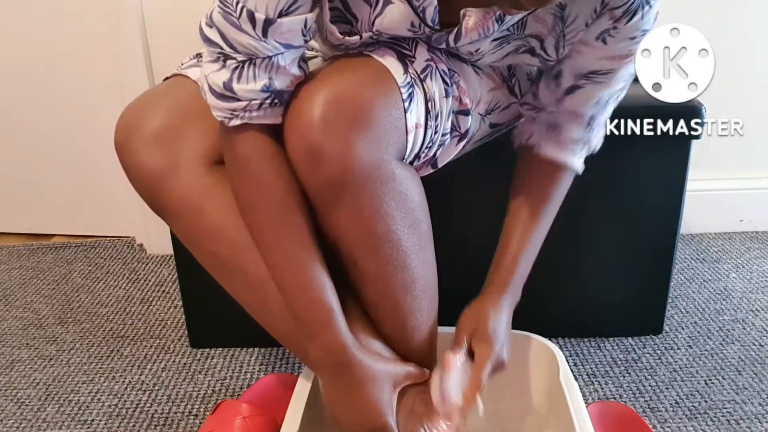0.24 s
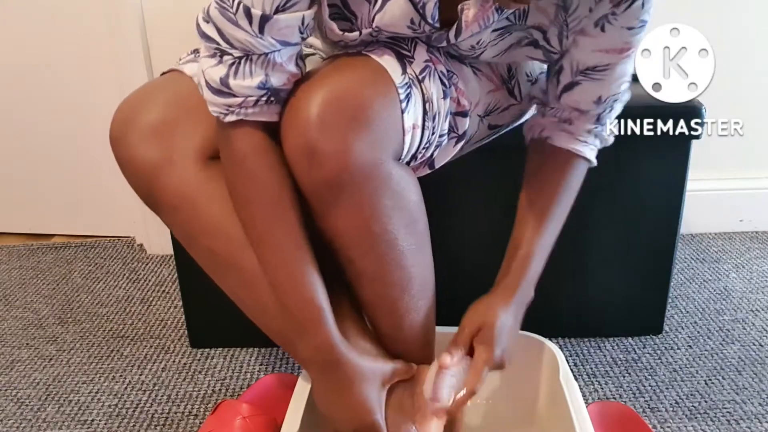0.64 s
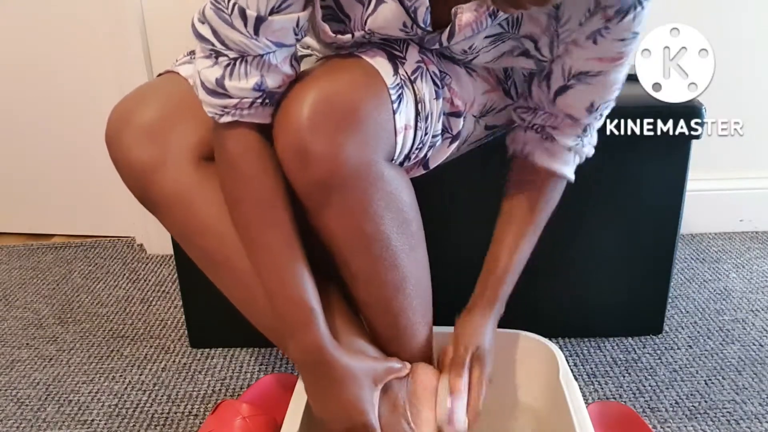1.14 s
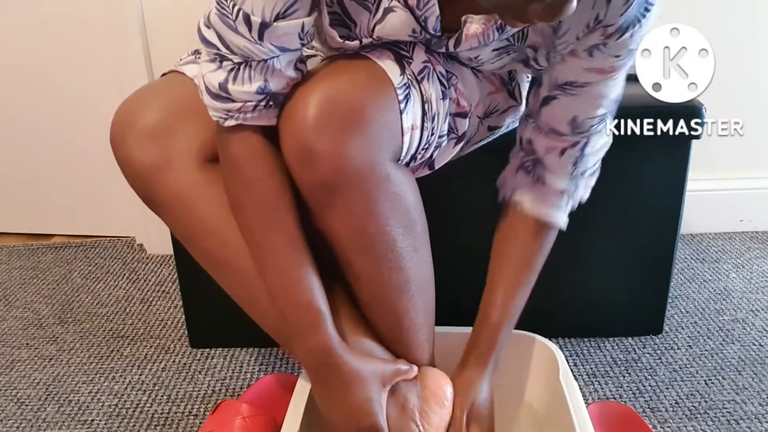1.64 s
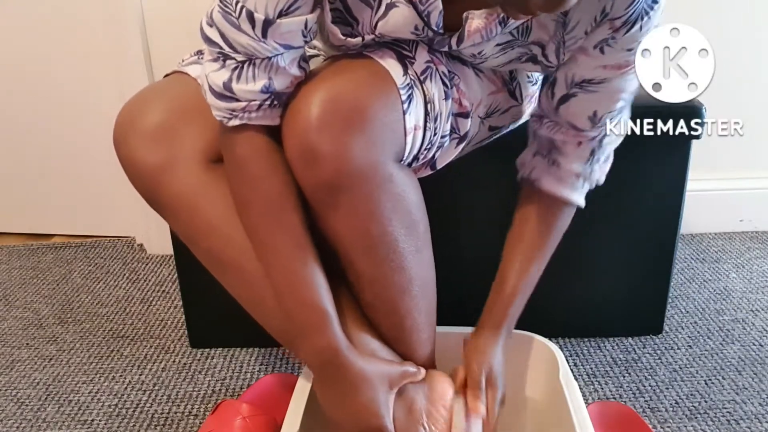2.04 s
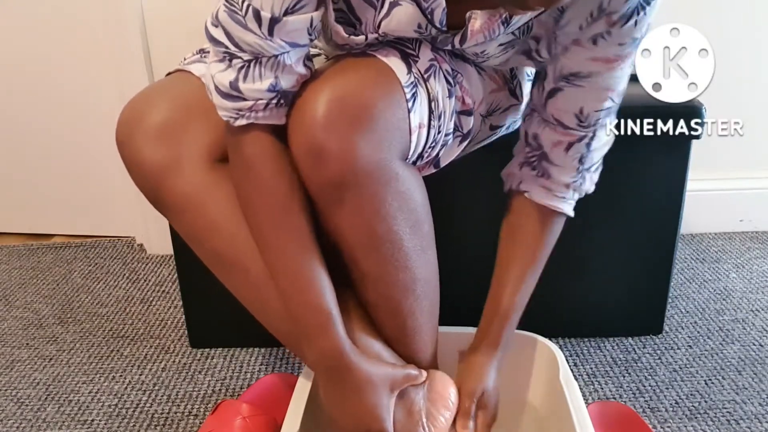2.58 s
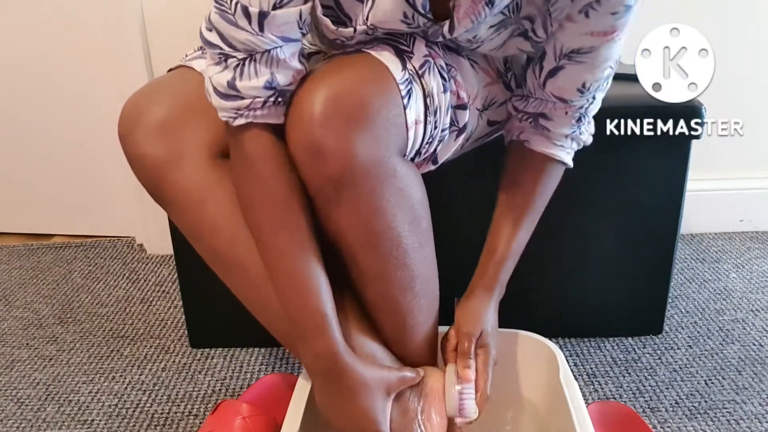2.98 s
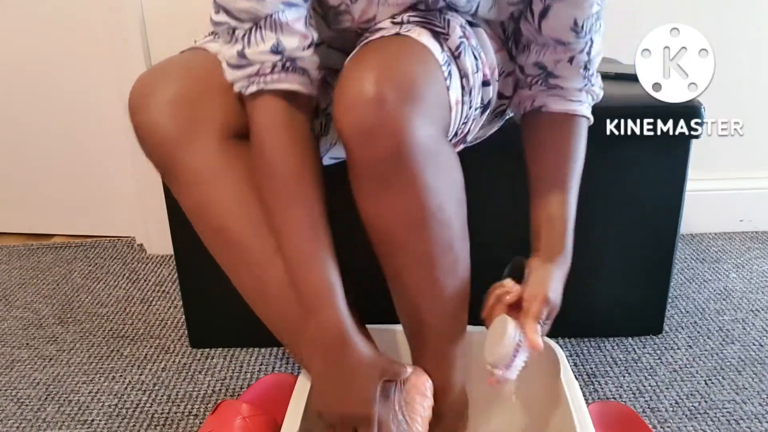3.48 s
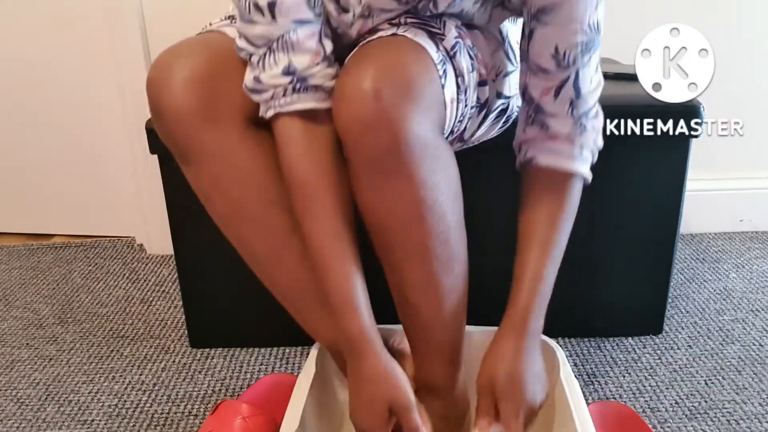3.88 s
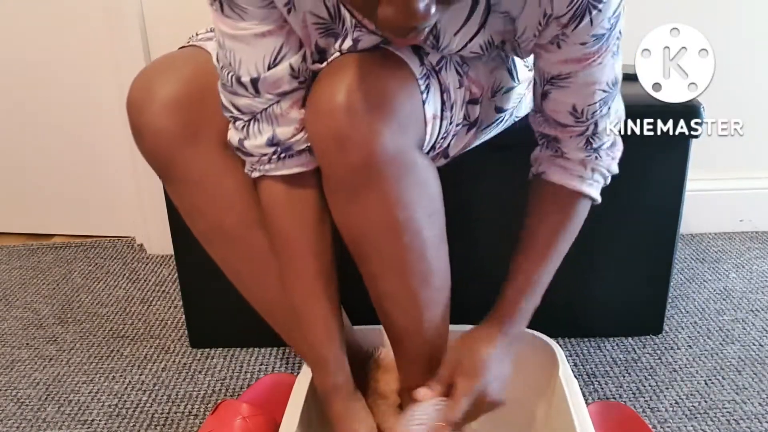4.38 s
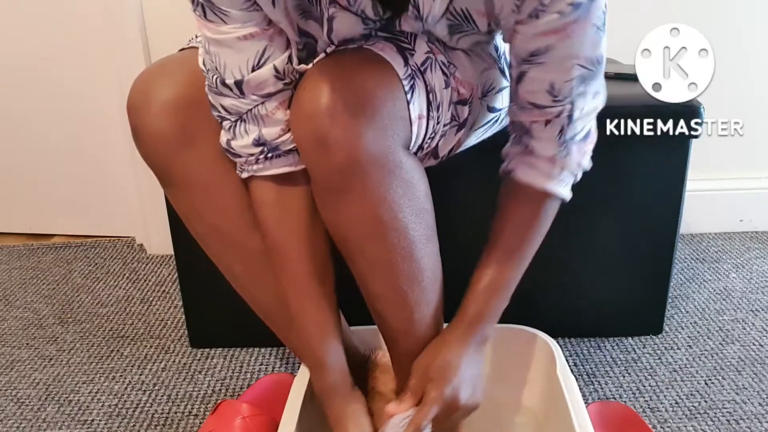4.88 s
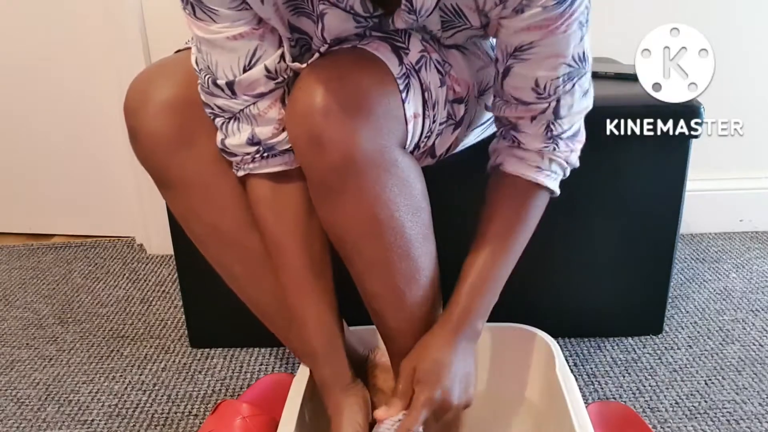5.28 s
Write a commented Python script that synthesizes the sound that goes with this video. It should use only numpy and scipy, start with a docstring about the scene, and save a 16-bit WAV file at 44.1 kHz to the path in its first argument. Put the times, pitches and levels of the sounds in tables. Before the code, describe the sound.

In a quiet room, heard from nearby, a splash with bubbles and drops comes from a plastic tub. Soft, gritty scrubbing follows, stone against a wet foot, several strokes a second, with faint creaks from the tub. The scrubbing fades, the tub gives a couple of dull knocks, and a second spell of sloshing and dripping dies away into faint rubbing.

```python
"""Pumice on a wet heel.

A pumice stone rasps to and fro on a heel, indoors: friction of grit on skin makes a swell of noise at
each stroke. Water sloshes as stone and foot go into a plastic basin; bubbles ring and drops smack.
The basin creaks, thumps and is knocked into resonance, and a quiet room reverberates and rumbles."""
import sys
import numpy as np
from scipy import signal
from scipy.fft import rfft, irfft, next_fast_len
from scipy.io import wavfile
from scipy.ndimage import uniform_filter1d

SR = 44100
rng = np.random.default_rng(int(sys.argv[2]) if len(sys.argv) > 2 else 0)


def to_wav(s):
    """Save 16-bit WAV."""
    ch = np.atleast_2d(s).T  # columns
    pcm = np.round(np.clip(ch, -1, 1) * 32767)  # PCM
    wavfile.write(sys.argv[1], SR, pcm.astype(np.int16))


N = 243431
T = np.arange(N) / SR


def scrub():
    """Friction noise: dense grit catches the skin and excites the duller resonances of heel and stone."""
    # Each row: time of full speed in seconds, level in dB, half width in seconds, body and treble in dB.
    strokes = [(0.667, -56.5, 0.027, -13, -5.5), (0.812, -67.5, 0.039, -13, 1.5),
               (0.918, -57.5, 0.061, -2, -1.5), (1.149, -58, 0.049, 0.5, -3),
               (1.242, -68.5, 0.0099, 5, -2.5), (1.326, -54, 0.037, 3.5, -1.5),
               (1.508, -61, .055, -4.5, -1), (1.713, -57.5, 0.035, 3, -0.5), (1.85, -70.5, 0.062, 2.5, 3),
               (1.937, -60, .055, -6, -3), (2.189, -66, 0.05, 3.5, 3), (2.394, -59.5, 0.043, -4, -2),
               (2.603, -62.5, .039, 1, 2), (2.78, -78, .042, -3.5, 3.5), (2.885, -68, 0.041, -15, -0.5),
               (3.135, -77.5, .033, -14.5, 2), (3.23, -76.5, 0.052, 1, 6), (3.5, -83, 0.12, 0.5, -4),
               (3.75, -80, .1, 1.5, 5.5), (3.846, -63, 0.029, 17.5, -1.5), (3.946, -83.5, 0.057, 4, 6),
               (5.285, -82.5, 0.038, -2.5, 4.5), (5.49, -72, 0.048, -1, -0.5)]
    # Each row: frequency in Hz, spectral level in dB.
    grit_spectrum = [(880, -45), (1500, -4), (1620, -7.5), (1870, -5.5), (2910, -1), (3410, -0.5),
                     (7390, -8), (14500, -23.5), (16000, -30)]
    # Each row: resonance in Hz, bandwidth in Hz, gain in dB.
    heel_modes = [(468, 150, 1), (795, 240, 5.5)]
    stone_modes = [(1307, 200, 11), (1360, 290, -0.5)]
    skew = 1.014  # stretches a stroke's rise and shortens its fall
    grit, treble, body = 0, 0, 0
    for s, db, half, body_db, treble_db in strokes:
        stroke = amp(db) * swell(s, half * skew, half / skew, flat=2.51)
        grit += stroke
        treble += amp(treble_db) * stroke
        body += amp(body_db) * stroke
    rasp = noise(band(spectrum(grit_spectrum), 1480, 5240), patchy_db=1)
    hiss = noise(band(spectrum(grit_spectrum), 5140, 15700), spiky_db=2, grain_s=0.0007, patchy_db=1.95)
    heel = noise(band(resonances(heel_modes), 420, 1100), spiky_db=3, grain_s=0.0018, patchy_db=-1.5)
    stone = noise(band(resonances(stone_modes), 950, 1550), spiky_db=4.5, grain_s=0.012, patchy_db=3.5)
    return amp(-3) * grit * rasp + amp(-1.5) * treble * hiss + body * (amp(-7.5) * heel + amp(-7) * stone)


def slosh():
    """Turbulence: wash, gurgle and spray follow the water's motion; small bubbles ring at random in it."""
    # One list a dip. Each row: time in seconds, level in dB, gurgle and spray in dB above that level.
    dips = [
        [(0, -50, 6, -3), (.061, -32.5, -5, -9.5), (.16, -55.5, 0, 0.5), (.2, -41, 0, -6.5),
         (.265, -44, -8, -8.5), (.35, -39.5, -4, -3), (.42, -41.5, -11.5, -13), (.47, -47.5, -1, -2.5),
         (.55, -58.5, -31, 0), (.61, -64.5, -34, -5.5), (.66, -68.5, -32, 2.5), (.76, -63, -3, -9),
         (.8, -90, -8, -9)],
        [(4.075, -77, -3.5, 4.5), (4.13, -48.5, -11, 3.5), (4.19, -48.5, -22, -15.5), (4.26, -63.5, 1, -3.5),
         (4.3, -48.5, -8, -6), (4.36, -55.5, 8, -3), (4.43, -53, 1.5, -10.5), (4.47, -44.5, 2.5, -18.5),
         (4.52, -42.5, -3.5, -5.5), (4.58, -51, 0.5, -5), (4.7, -71.5, -10, -3.5), (4.79, -69.5, 0, 2),
         (4.82, -56.5, -6.5, -9), (4.87, -57.5, -7, -5), (4.92, -83, -9, 4), (4.985, -78, -5.5, 3),
         (5.025, -56, -4.5, -5), (5.07, -67.5, -1, -2.5), (5.15, -95.5, -12.5, 10.5)],
    ]
    # Each row: frequency in Hz, spectral level in dB.
    wash_spectrum = [(180, -36.5), (300, -7.5), (645, -15), (946, -10), (1170, -7.5), (1480, -10),
                     (2140, -7), (3760, -3), (4910, -4.5), (9880, -19), (16000, -32)]
    # The air over the water. Each row: resonance in Hz, bandwidth in Hz, gain in dB.
    air_modes = [(785, 150, -4.5), (905, 130, 0), (1310, 100, -13), (1720, 140, -2.5), (3100, 490, 2),
                 (3620, 250, -1)]
    wash_db, gurgle_db, spray_db = np.full((3, N), -120.)
    for dip in dips:
        s, db, gurgle_over, spray_over = np.transpose(dip)
        wet = (T >= s[0]) & (T <= s[-1])
        for level, over in (wash_db, 0), (gurgle_db, gurgle_over), (spray_db, spray_over):
            level[wet] = np.interp(T[wet], s, db + over)
    colour = lambda f: spectrum(wash_spectrum)(f) * (1.8 + abs(resonances(air_modes)(f)))
    out = amp(wash_db - 1) * noise(band(colour, 1500, 6500), spiky_db=5, grain_s=0.0018, patchy_db=4)
    out += amp(gurgle_db) * noise(band(colour, 470, 1600), spiky_db=1.5, grain_s=0.0045, patchy_db=7.5)
    out += amp(spray_db) * noise(band(colour, 7900, 17000), spiky_db=3, grain_s=0.0016, patchy_db=-4.5)
    for when, pitch, life, faintness, pan in rng.random((2000, 5)):
        hz, n = 1200 * 8 ** pitch, int(when * N)
        db = (spray_db if hz > 6000 else wash_db)[n] - 7.5 - 3.5 * np.log(faintness + 0.018)
        if db > -90:
            ring = bubble(hz, t60=(15 + 35 * life) / hz, glide=0.05)
            place(out, n / SR, amp(db) * ring, pan_db=8 * (pan - 0.5))
    return out


def bubble(hz, t60, glide):
    """Damped oscillation: trapped air rings, rising in pitch as it nears the surface."""
    t = np.arange(int(t60 * SR)) / SR
    onset = 1 - np.exp(-t / 0.00077)
    return amp(-60 * t / t60) * onset * np.sin(2 * np.pi * hz * t * (1 + glide * t / t60))


def timed_bubbles():
    """Bubble resonance: further bubbles at set times, each ringing its own note for its own length, left of
    centre."""
    # Each row: start in seconds, level in dB, pitch in Hz, 60 dB decay time in milliseconds.
    bubbles = [(.016, -35, 527, 87), (0.058, -37, 6600, 10), (0.143, -30, 1460, 20), (.176, -35.5, 930, 86),
               (0.18, -25.5, 4010, 14), (0.203, -28.5, 1249, 77), (0.219, -35.5, 2630, 49),
               (0.238, -30, 4880, 16), (0.251, -31, 4600, 19), (.277, -25.5, 780, 43),
               (.307, -28.5, 5390, 18), (0.335, -33, 1590, 21), (0.347, -37, 2990, 72),
               (.356, -32, 2130, 33), (.389, -23.5, 5660, 10), (.405, -27, 3950, 17),
               (0.426, -23.5, 2300, 14), (0.424, -23, 3860, 18), (.447, -38, 1050, 22),
               (.458, -24, 3730, 13), (.464, -27, 2320, 16), (0.537, -42.5, 3170, 27),
               (.596, -37, 2086, 43), (0.654, -64, 1360, 100), (0.656, -52.5, 1784, 69),
               (0.683, -52.5, 1360, 47), (0.682, -43, 3320, 10), (1.915, -45.5, 9200, 9.4),
               (4.104, -24, 6450, 6.6), (4.134, -24.5, 6570, 10.5), (4.274, -30, 3640, 12.4),
               (4.297, -26.5, 3170, 13), (4.313, -35, 1080, 26), (4.312, -20, 7240, 11.6),
               (4.359, -43, 2500, 31), (4.382, -23.5, 2760, 14), (4.457, -32, 3970, 20),
               (4.476, -38.5, 3790, 150), (4.501, -30, 1420, 18), (4.514, -24, 7000, 8),
               (4.526, -29.5, 2830, 11.7), (4.531, -18.5, 8300, 10), (4.541, -20, 5600, 8.1),
               (4.556, -23, 3780, 9.6), (4.58, -36, 4600, 20), (4.584, -48.5, 930, 32),
               (4.635, -39.5, 4880, 13), (4.659, -45.5, 880, 15), (4.7, -46, 7200, 14),
               (4.72, -49, 3520, 21), (4.74, -32, 4970, 10), (4.758, -71, 5180, 11),
               (4.811, -40.5, 2250, 16), (4.849, -44, 4420, 11), (4.858, -49.5, 1180, 15),
               (4.939, -59.5, 3500, 46), (4.958, -48.5, 7630, 17), (4.996, -39.5, 7460, 14),
               (5.01, -41, 5990, 13), (5.021, -54, 2950, 22)]
    out = np.zeros((2, N))
    for s, db, hz, t60_ms in bubbles:
        place(out, s, amp(db) * bubble(hz, t60_ms / 1000, glide=0.022), pan_db=rng.normal(3, 0.74))
    return out


def smacks():
    """Impact noise: drops and wet skin snap briefly, then finer droplets fall back."""
    # Each row: start in seconds, level in dB, brightest frequency in Hz.
    impacts = [(.0059, -16.5, 3830), (.0082, -10, 1920), (.058, -35, 7400), (.168, -28.5, 7300),
               (0.197, -25, 3800), (0.252, -31, 3800), (.275, -22, 2380), (0.352, -21.5, 7500),
               (.387, -27.5, 5200), (.404, -23.5, 2830), (0.427, -22.5, 5100), (.445, -27, 1900),
               (0.488, -33.5, 4500), (1.021, -48, 8360), (1.04, -50, 7500), (1.771, -41.5, 6400),
               (3.93, -48.5, 7630), (4.1, -35.5, 6960), (4.102, -38, 7500), (4.112, -33, 5400),
               (4.12, -32, 7300), (4.132, -29.5, 4500), (4.147, -25.5, 3230), (4.259, -41.5, 7200),
               (4.276, -35.5, 3850), (4.31, -28, 2770), (4.3809, -27.5, 3300), (4.383, -34.5, 8100),
               (4.468, -33.5, 7900), (4.498, -32, 4630), (4.518, -31, 7540), (4.54, -27, 5905),
               (4.74, -47, 6300), (4.802, -41.5, 5600), (4.849, -44, 5440), (4.931, -52.5, 7000),
               (4.992, -51, 8060), (5.006, -43, 3500)]
    breadth_hz, click_gain = 2920, 0.04
    out, t = np.zeros((2, N)), np.arange(4096) / SR
    f = np.fft.rfftfreq(len(t), 1 / SR) + 1
    onset = 1 - np.exp(-t / 0.00011)
    for s, db, hz in impacts:
        hump = 1 / (1 + (np.log2(f / hz) * hz / breadth_hz) ** 4)
        hiss = irfft(rfft(rng.standard_normal(len(t))) * (hump + click_gain * (f > hz)))
        spatter_db = -18 - 0.25 * (db + 28.5)  # a smaller share of a louder smack
        smack = hiss * onset * (amp(-60 * t / 0.015) + amp(spatter_db - 60 * t / 0.1))
        place(out, s, amp(db) * smack / abs(smack).max(), pan_db=rng.normal(3, 0.296))
    return out


def basin_shoves():
    """Structure-borne sound: shifting under foot and hand, the basin creaks and thuds through the floor."""
    # Each row: time in seconds, creak in dB, its half width in seconds, thud in dB, thud pitch in Hz.
    shoves = [(0.153, -54, 0.078, -54, 71), (0.308, -50, 0.019, -55, 80), (.78, -57, 0.056, -58, 65),
              (1.255, -53, 0.037, -50.5, 65), (1.587, -56.5, 0.035, -51.5, 53),
              (2.042, -66, 0.017, -65, 58), (2.25, -68.5, 0.021, -64, 52), (2.756, -74, 0.017, -52.5, 50),
              (3.19, -68.5, 0.034, -67, 55), (3.595, -65.5, 0.06, -64.5, 55), (3.713, -63, 0.058, -64, 60),
              (3.83, -54, 0.011, -39, 85), (3.864, -50.5, 0.048, -40, 58.7), (3.954, -62, 0.006, -57, 61),
              (4.179, -49.5, 0.04, -46.5, 86), (4.401, -57.5, 0.07, -62.5, 55), (5.22, -79, 0.07, -58, 99)]
    # Each row: frequency in Hz, spectral level in dB.
    creak_spectrum = [(59, -30.5), (100, -1.5), (248, -6), (599, -14), (660, -19), (1010, -21),
                      (1800, -34.5), (2340, -44), (3960, -120)]
    creak, thud = 0, 0
    for s, creak_db, half, thud_db, hz in shoves:
        creak += amp(creak_db) * swell(s, half, half)
        thud += amp(thud_db) * swell(s, 0.9 * half, 0.053) * np.sin(2 * np.pi * (hz * T + rng.random()))
    return thud + creak * noise(spectrum(creak_spectrum), spiky_db=2, grain_s=0.012, patchy_db=3.5)


def basin_knocks():
    """Modal ringing: each blow excites the water-laden walls and leaves them shuddering."""
    # Each row: start in seconds, blow in dB, shudder in dB, its 60 dB decay time in seconds.
    knocks = [(3.802, -22.5, -86, 0.078), (3.818, -13, -29, 0.26), (3.825, -15, -47, 0.61),
              (4.148, 11.5, -12, 0.015), (4.152, 8, -19.5, 0.3)]
    # Each row: resonance in Hz, bandwidth in Hz, gain in dB.
    wall_modes = [(165, 60, -8), (345.5, 34, -2), (496, 70, 1), (660, 134, -2), (950, 88, -11),
                  (1170, 45, -9.5), (1770, 280, -12), (2830, 820, -18.5)]
    shake = noise(np.ones_like, spiky_db=3, grain_s=0.0055, patchy_db=-1)
    shake = 1.13 * shake + 0.46 * shake.mean(0)  # the walls are near: both sides hear much the same
    force = np.zeros((2, N))
    for s, blow_db, shudder_db, t60 in knocks:
        force[:, round(s * SR)] += amp(blow_db)
        force += (T > s) * amp(shudder_db - 60 * abs(T - s) / t60) * shake
    return filtered(force, resonances(wall_modes))


def reverberation(x):
    """Absorption: the room's reflections die away, the treble soonest."""
    # Each row: frequency in Hz, 60 dB decay time in seconds.
    decay_times = [(200, 0.66), (2000, 0.57), (10000, 0.074)]
    hz, t, z = signal.stft(rng.standard_normal((2, SR // 3)), SR, nperseg=256)
    tail = signal.istft(z * amp(-60 * t / along(decay_times, hz)[:, None]), SR, nperseg=256)[1]
    delayed = np.pad(x, ((0, 0), (150, 0)))
    return signal.fftconvolve(delayed, tail / np.linalg.norm(tail[0]), axes=1)[:, :N]


def room_tone():
    """Ambient noise: a low, resonant building rumble over the room's faint, even hiss."""
    # Each row: resonance in Hz, bandwidth in Hz, gain in dB.
    rumble_modes = [(50, 6.9, 2.5), (81, 64.6, -7), (93, 18, -2), (150.9, 4, -9), (288, 13, -20),
                    (331.2, 13, -24)]
    # Each row: frequency in Hz, spectral level in dB.
    hiss_spectrum = [(25, -6), (80, -8.5), (200, -31), (400, -28), (800, -28.5), (1500, -37.5), (4000, -38),
                     (9000, -40), (13000, -44.5), (16000, -58.5)]
    rumble = noise(band(resonances(rumble_modes), 38, 500), spiky_db=-1, grain_s=0.06, patchy_db=-2)
    return amp(-65) * rumble + amp(-71.5) * noise(spectrum(hiss_spectrum), patchy_db=1)


def noise(response, patchy_db, spiky_db=0, grain_s=1):
    """Random modulation: stereo noise of rms 1, jumping in level by grains, drifting in colour by patches."""
    # Each row: frequency in Hz, left-right correlation from 0 to 1.
    coherence = [(30, 0.94), (60, 1), (300, 0.59), (600, 0.33), (1000, 0.34), (2400, 0.32), (6000, 0.076),
                 (15000, 0.043)]
    jumps = rng.standard_normal(N)[(T / grain_s).astype(int) % N]
    z = signal.stft(rng.standard_normal((2, N)) * amp(spiky_db * jumps), nperseg=256)[2]
    patches = uniform_filter1d(rng.standard_normal(z.shape[1:]), size=2, axis=0)
    patches = uniform_filter1d(patches, size=12, axis=1)
    pair = signal.istft(z * amp(patchy_db * unit(patches)), nperseg=256)[1][:, :N]
    angle = lambda f: np.arccos(along(coherence, f)) / 2
    mid, side = filtered(pair, lambda f: response(f) * np.array([np.cos(angle(f)), np.sin(angle(f))]))
    return unit(np.array([mid + side, mid - side]))


def amp(db):
    """Decibels to gain."""
    return 10 ** (np.asarray(db) / 20)


def unit(x):
    """Normalisation to rms 1."""
    return x / np.sqrt(np.mean(x ** 2) + 1e-20)


def along(points, hz):
    """Interpolation on a log frequency axis."""
    f, values = np.transpose(points)
    return np.interp(np.log(hz + 1), np.log(f + 1), values)


def spectrum(points):
    """A spectral envelope through (Hz, dB) points."""
    return lambda f: amp(along(points, f))


def resonances(modes):
    """Superposition of damped modes, alternating in sign."""
    return lambda f: sum((-1) ** k * amp(db) * 1j * f * width / (hz * hz - f * f + 1j * f * width)
                         for k, (hz, width, db) in enumerate(modes))


def band(response, lo_hz, hi_hz):
    """Steep band-pass limiting of a response."""
    return lambda f: response(f) / (1 + (lo_hz / (f + 1)) ** 4) / (1 + (f / hi_hz) ** 4)


def filtered(x, response):
    """Linear filtering in the frequency domain."""
    m = next_fast_len(N + 8192)
    return irfft(rfft(x, m) * response(np.fft.rfftfreq(m, 1 / SR)), m)[..., :N]


def swell(s, rise, fall, flat=2):
    """A bell envelope peaking at s, halved rise seconds before and fall after; more flat is squarer."""
    return 2. ** -(abs((T - s) / np.where(T < s, rise, fall)) ** flat)


def place(out, s, sound, pan_db):
    """Path difference: a sound added at s reaches the farther side weaker and a little later."""
    for channel, db in zip(out, [pan_db / 2, -pan_db / 2]):
        part = channel[round(s * SR + max(-1.5 * db, 0)):][:len(sound)]
        part += amp(db) * sound[:len(part)]


def scene():
    """Superposition of all sources; drops, water and stone also excite the room."""
    drops, water, rasp = timed_bubbles() + smacks(), slosh(), scrub()
    reflections = reverberation(amp(-12) * drops + amp(-17) * water + amp(-15.5) * rasp)
    return rasp + water + drops + basin_shoves() + basin_knocks() + reflections + room_tone()


def record(dry):
    """Band limiting: the microphones lose the deepest bass and the highest treble."""
    return filtered(dry, lambda hz: (hz < 15850) / (1 + (38 / (hz + 1)) ** 4))


dry = scene()
out = record(dry)
to_wav(out)
```